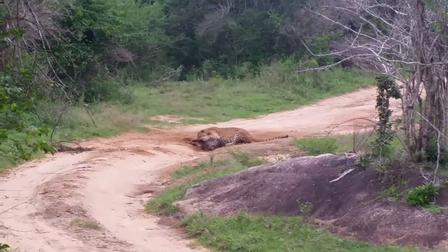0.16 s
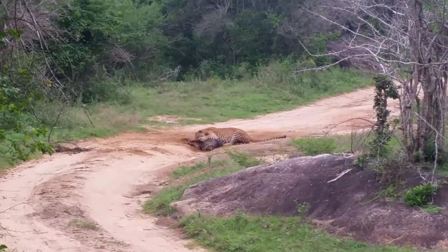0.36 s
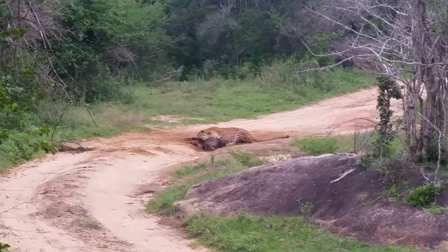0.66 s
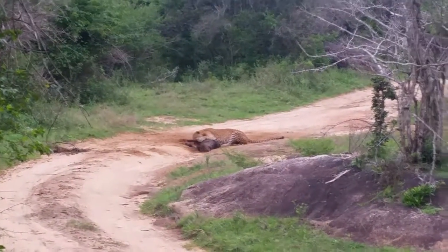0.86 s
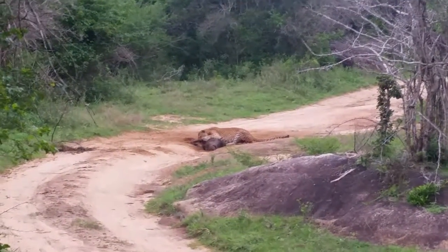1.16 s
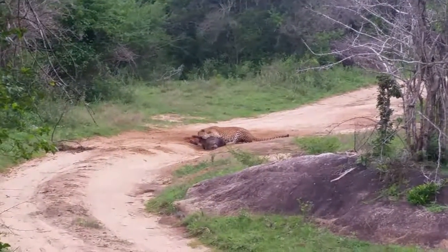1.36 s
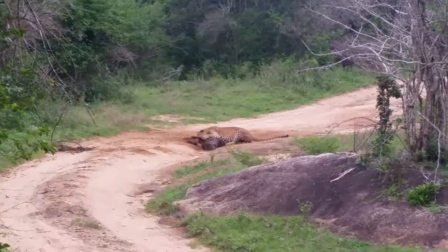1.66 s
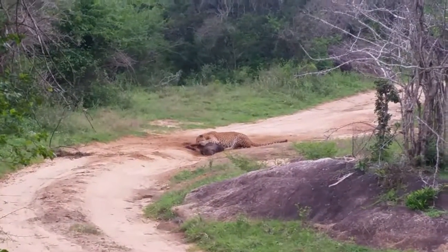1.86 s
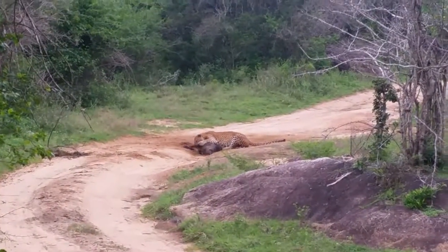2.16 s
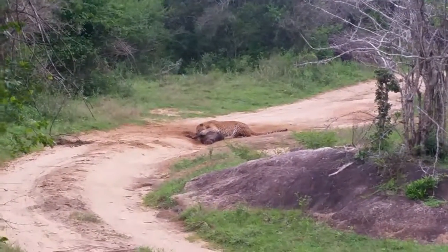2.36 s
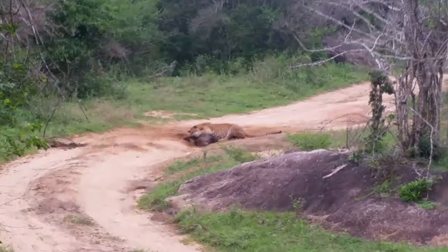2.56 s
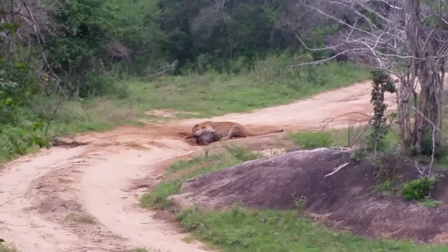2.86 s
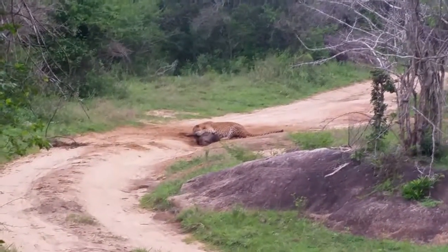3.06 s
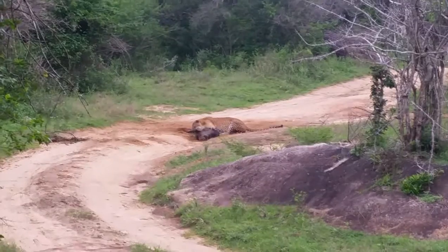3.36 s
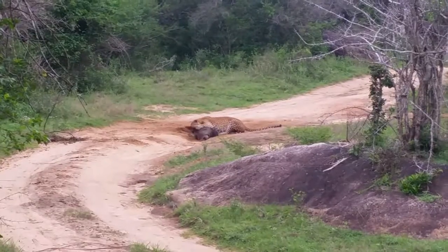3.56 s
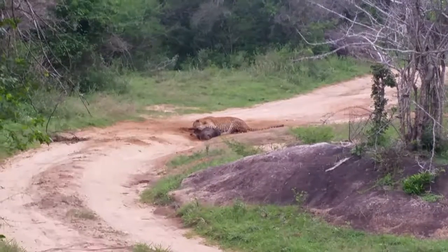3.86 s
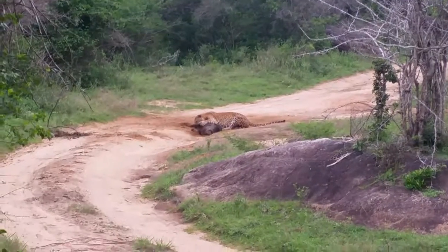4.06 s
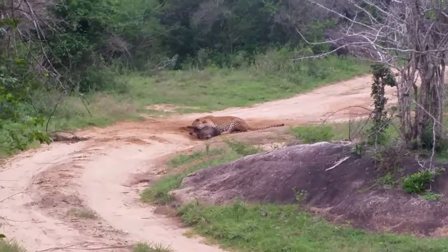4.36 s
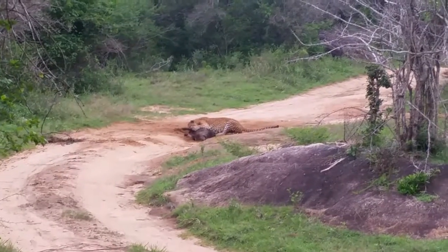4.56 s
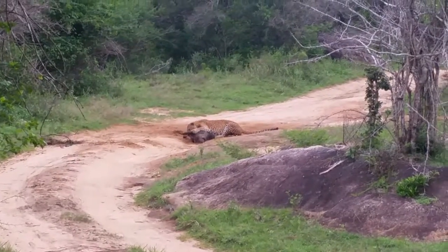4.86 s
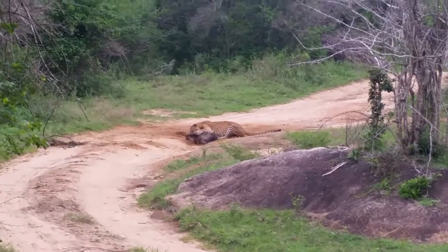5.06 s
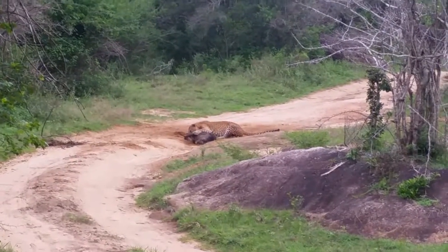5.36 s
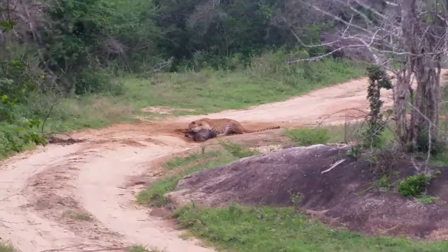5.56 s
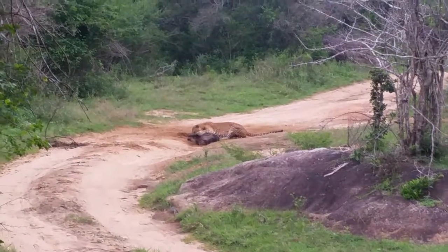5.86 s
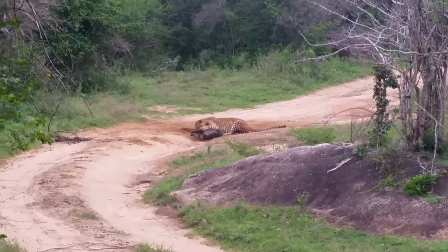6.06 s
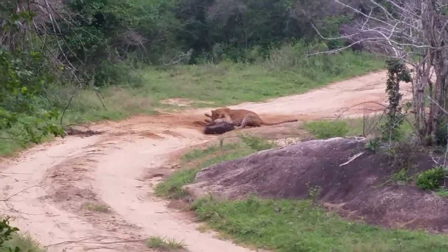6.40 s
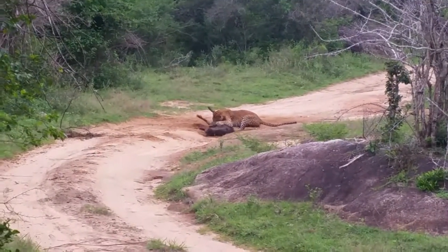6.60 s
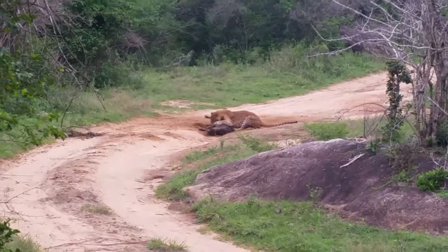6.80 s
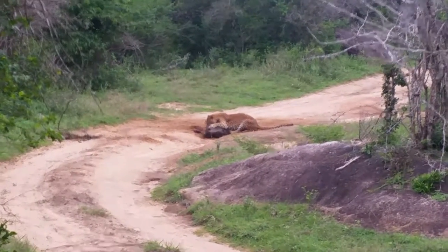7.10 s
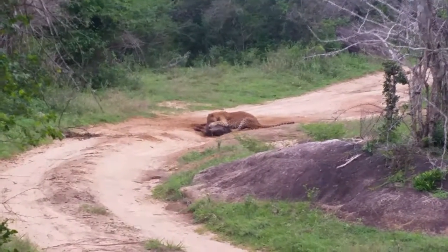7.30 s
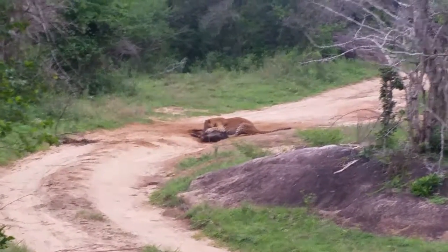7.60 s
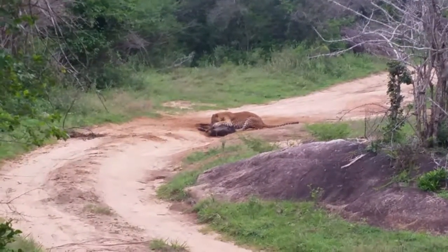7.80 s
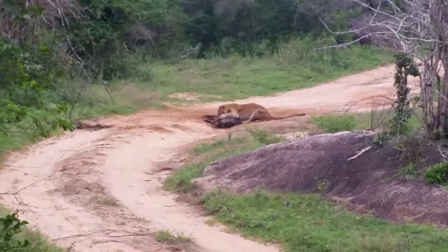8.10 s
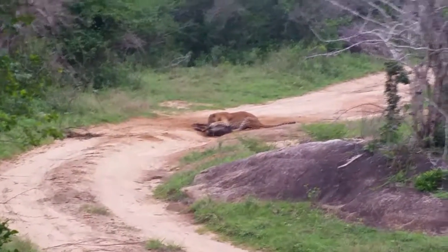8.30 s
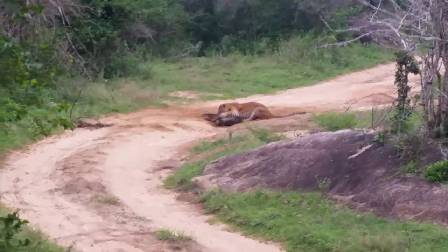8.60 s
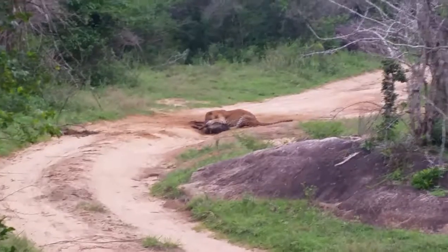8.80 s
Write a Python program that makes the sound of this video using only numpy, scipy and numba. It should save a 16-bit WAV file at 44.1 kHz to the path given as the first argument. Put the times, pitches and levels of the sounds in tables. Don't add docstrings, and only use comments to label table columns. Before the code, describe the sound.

Outdoors on a forest track, a high, steady cricket chorus hums over light breeze, leaf hiss and low wind thuds on a small stereo camera microphone. A faint bird whistle falls early on; a cricket trill swells midway. Small taps and a seat creak come from the parked vehicle. Then a boar held down by a big cat pants faintly, grunts, squeals roughly and gasps, while a close cricket chirps loudly until the end.

```python
import sys
import numpy as np
from scipy import signal
from scipy.fft import rfft, irfft, next_fast_len
from scipy.io import wavfile
from scipy.ndimage import uniform_filter1d
from numba import njit

SR = 44100
rng = np.random.default_rng(int(sys.argv[2]) if len(sys.argv) > 2 else 0)


def digitize_waveform(pressure):
    field = np.atleast_2d(pressure).T
    bounded = np.clip(field, -1, 1)
    quanta = np.round(bounded * 32767).astype(np.int16)
    wavfile.write(sys.argv[1], SR, quanta)


def ratio(d):
    e = np.asarray(d, float) / 20
    return 10 ** e


N = 394254
T = np.arange(N) / SR

# [t/s, level/dB]
SWELL = [(0.0, -1.74), (1.12, -2.5), (1.77, -1.16), (4.16, -0.75), (4.36, 0.5), (5.95, 0.8), (6.3, -0.5),
         (6.62, -0.7), (6.9, 3), (8.2, 4.5), (8.61, 1.8), (8.94, 2.5)]
# [rate/bursts per s, f/Hz, level/dB]
CHORUS = [(11.6, 7000, -59.5), (16, 6800, -73), (12, 7300, -63.5), (3.3, 6600, -68.5)]
# [f/Hz, density/dB per Hz]
HUM = [(1710, -72), (2900, -35), (3610, -15), (5050, -30.5), (5610, -30), (6000, -4), (6980, 1.5),
       (7850, -10), (8410, -51), (8600, -28), (11200, -76), (18900, -120)]
# [f/Hz, density/dB per Hz]
LEAVES = [(5760, -49.5), (9800, -0.5), (10800, -7.5), (12300, -1.5), (14900, -4), (15900, -2.5)]
# [f/Hz, density/dB per Hz]
WIND = [(8.8, -33.5), (15, -8.5), (22, -14), (76, -7), (188, -16), (224, -19), (399, -29), (793, -37.5),
        (1840, -47.5), (3000, -56.5), (3900, -56), (6600, -120)]
# [t/s, peak level/dB, f/Hz, left
# minus right/dB]
THUDS = [(0.264, -49, 81, 7), (0.925, -50, 81, -1.5), (1.182, -52.5, 86, 14), (1.316, -51.5, 143, -10),
         (2.193, -46, 80, -8), (2.326, -49.5, 78.1, -11), (2.755, -44.5, 53.8, 11),
         (2.926, -46.5, 106.7, -5), (3.048, -44.5, 72, -13), (3.889, -49, 170, -14), (4.087, -42, 127, -18),
         (4.206, -51.5, 87, -5.5), (5.18, -47.5, 137, 17), (6.173, -48, 156, -3), (8.026, -44, 200, 0.1),
         (8.288, -51, 130.4, -3), (8.37, -49, 110, 3), (8.4, -41, 147, -1), (8.44, -52, 120, -1),
         (8.645, -50, 170, -10), (8.78, -49, 72.5, -3)]
# [t/s, peak level/dB, decay/s, f/Hz]
TAPS = [(2.482, -57.5, 0.0071, 1410), (3.51, -68, 0.12, 810), (3.61, -69, 0.091, 945),
        (3.709, -67.5, 0.056, 1650), (4.609, -56, 0.063, 800), (5.27, -58, 0.02, 1430),
        (5.869, -58, 0.029, 1650)]
# [t/s, peak level/dB, fade/dB per s]
CREAKS = [(5.81, -61.5, 108), (5.86, -52.5, 94), (5.93, -64, 63), (5.98, -59, 262), (6.198, -66.5, 300)]
# [start t/s, end t/s, start level/dB, end level/dB]
FAINT_SPELLS = [(1.3, 2.358, -97, -66.5), (2.36, 4.05, -71.5, -71.5), (5.32, 6.0, -71, -91),
                (7.453, 7.837, -66, -62), (8.275, 8.68, -67.5, -72.5)]
# [start t/s, period/s, chirps]
TRILL = [
    (4.0245, .0368, 9),
    (4.3805, .0768, 12),
]
# [left delay/ms, right delay/ms, level/dB]
TRILL_ECHOES = [(.3, .1, 5.5), (5.4, 5.1, 5), (11.2, 10.4, -1.5), (16.5, 17.5, -7.5)]
# [t/s, peak level/dB, middle f/Hz, wing strokes]
NEAR_CHIRPS = [(2.7756, -58, 5040, 1), (2.83, -54.5, 5040, 1), (2.899, -49.5, 5170, 2),
               (7.1783, -44.5, 4790, 1), (7.235, -44.5, 4810, 1), (7.2957, -40.5, 5000, 2),
               (7.3877, -36, 5070, 2), (7.8363, -41, 4720, 1), (7.87, -37, 5130, 2), (7.95, -32.5, 5190, 2),
               (8.0318, -31.5, 5230, 2), (8.1204, -30.5, 5260, 2), (8.2135, -30.5, 5280, 2),
               (8.688, -43.5, 5150, 2), (8.7621, -36.5, 5220, 2), (8.8402, -33.5, 5260, 2),
               (8.924, -32, 5290, 1)]
# [left delay/ms, right delay/ms, level/dB]
NEAR_ECHOES = [(5.5, 5.2, -2), (9, 4.5, -10), (14, 4.3, -30)]
# [f/Hz, level/dB]
GRILLE = [(7900, -0.5), (8350, -5), (8600, -16), (9400, -14), (9900, -2), (10300, 3)]
# [t/s, effort level/dB, mouth opening 0-1]
CRIES = [
    [(5.42, -78, 0.1), (5.516, -49.5, 0.14), (5.644, -47.5, 0.12), (5.72, -70, 0.45)],
    [(6.55, -96, 0.4), (6.6, -51.5, 0.6), (6.63, -38, 0.65), (6.66, -34.5, 0.66), (6.73, -37, 0.67),
     (6.81, -56, 0.89)],
    [(6.81, -59.5, 0.83), (6.92, -42, 0.68), (6.98, -35.5, 0.53), (7.06, -35, 0.78), (7.25, -35, 0.76),
     (7.43, -30.5, 0.72), (8.04, -28.5, 0.69), (8.13, -30.5, 0.66), (8.225, -43.5, 0.72)],
    [(8.225, -48.5, 0.74), (8.29, -44, 0), (8.325, -58, .45), (8.36, -53.5, .08), (8.5, -60, 0.19),
     (8.6, -77, .45)],
]
# [jaw resonance level/dB, chest level/dB, snout level/dB, chest lead/s]
POSTURES = [
    (-9.5, -7.5, -17, 0.0078),
    (-2.1, -6, -20, 0.03),
    (-39, -5, -13, 0.032),
    (-14, 0, 6.5, 0.001),
]
# [t/s, fold f/Hz, first partial level/dB, second partial level/dB, flap f/Hz]
WHISTLE = [(7.06, 502.2, -42, -44, 90.2), (7.22, 479.4, -45, -40, 84.52),
           (7.47, 481.6, -42.5, -35.5, 94.16), (7.57, 504, -41, -37.5, 92.9),
           (7.66, 486, -42, -34.5, 87.84), (7.84, 476.4, -37.5, -39, 92.16),
           (8.03, 456.1, -30, -41.5, 92.7), (8.126, 468, -30, -62, 90.3), (8.2, 490, -38, -68.5, 97.8)]
# [t/s, f/Hz, level/dB]
GLIDE = [(6.86, 684.3, -47), (6.874, 689, -49.5), (6.884, 736, -50.5), (6.954, 734.9, -35.5),
         (7.024, 871, -37), (7.06, 870, -51.5)]
# [t/s, rasp share 0-1]
RASP = [(7.0, 1), (7.12, .45), (7.3, .26), (7.55, .16), (7.8, .2), (8.04, .24), (8.1, .7), (8.2, 1)]
# [f/Hz, level/dB]
NASAL_VALLEYS = [(590, 0.5), (680, -6.5), (770, -2.5), (2400, 1), (2570, -11), (2750, -13), (3150, -11),
                 (3450, -14.5), (3800, 3.5)]
# [f/Hz, left minus right/dB]
SHADE = [(600, 1.5), (780, 6.5), (950, 10), (1120, 17), (1290, -6), (1550, 5), (1800, 8.5), (2050, -1),
         (2800, 12.5), (4400, 2)]


def unit(x):
    return x / rms(x)


def rms(x):
    return np.sqrt(np.mean(x ** 2, axis=-1, keepdims=True))


def even(x, hold_s=0.05):
    return x / np.sqrt(np.abs(uniform_filter1d(x ** 2, int(hold_s * SR))) + 1e-9)


def columns(rows, silent=None):
    s, *rest = np.transpose(rows)
    return [np.interp(T, s, c, silent, silent) for c in rest]


def sweep_phase(hz):
    return 2 * np.pi * np.cumsum(hz) / SR


def colour(x, points, power=0.89):
    hz, db = np.transpose(points)
    size = next_fast_len(N + 4096, True)
    f = np.maximum(np.linspace(0, SR / 2, size // 2 + 1), 1)
    gain = ratio(power * np.interp(np.log(f), np.log(hz), db))
    return irfft(rfft(x, size) * gain, size)[..., :N]


def walk(rate):
    k = int(SR / rate)
    held = np.repeat(rng.standard_normal(N // k + 1), k)
    return uniform_filter1d(uniform_filter1d(held, k), k)[:N]


@njit
def svf(x, g, k):
    y, b, l = np.empty(len(x)), 0., 0.
    for i in range(len(x)):
        v = (b + g[i] * (x[i] - l)) / (1 + g[i] * (g[i] + k[i]))
        b, l, y[i] = 2 * v - b, l + 2 * g[i] * v, k[i] * v
    return y


def ring(x, hz, width, start=int(5.3 * SR)):
    g = (np.tan(np.pi * hz / SR) + 0 * T)[start:]
    k = (width / hz + 0 * T)[start:]
    return np.pad(svf(svf(x[start:], g, k), g, k), (start, 0))


def forest(x, t60_s, wet_db):
    t = T[:SR]
    tail = rng.standard_normal((2, SR)) * ratio(-60 * t / t60_s) * np.minimum(t / 0.0009, 1)
    tail /= np.sqrt(np.sum(tail ** 2, axis=1, keepdims=True))
    size = next_fast_len(N + SR, True)
    return ratio(wet_db) * irfft(rfft(x, size) * rfft(tail, size), size)[:, :N]


def echoes(x, rows):
    out = np.zeros((2, N))
    for *delays_ms, db in rows:
        for port, source, ms in zip(out, x, delays_ms):
            lag = int(abs(ms) * SR / 1000)
            port[lag:] += ratio(db) * source[:N - lag]
    return out


def add(out, s, grain, pan_db=0.):
    i = max(int(s * SR), 0)
    out[:, i:i + grain.shape[-1]] += grain[..., :N - i] * ratio(np.array([[pan_db], [-pan_db]]) / 2)


def chirp(hz, second_db=-20, third_db=-30, sweep=0.4, length_s=0.01095, skew=1.71, fade=0.15):
    u = np.arange(int(length_s * SR)) / (length_s * SR)
    phase = sweep_phase(hz * (1 + sweep * (0.62 - u)))
    octave = ratio(second_db) * np.sin(2 * phase) * np.exp(-fade * (u - 0.4)) * np.array([[1], [-1]])
    third = ratio(third_db) * np.sin(3 * phase)
    return np.sin(np.pi * u ** skew) ** 2 * (np.sin(phase) + octave + third)


def singer(rate, hz, count, sweep=0.291, length_s=0.01303):
    out = np.zeros((2, N))
    chance = rng.standard_normal((120, 3))
    times = np.cumsum((1 + 0.012 * chance[:, 0]) / rate)
    for s, (_, size, detune) in zip(times, chance):
        stroke = chirp(hz * (1 + 0.01 * detune), -38.0, -70.5, sweep, length_s) * ratio(2 * size)
        for start in s - 0.08 + 0.02 * np.arange(count):
            if 0 < start < N / SR:
                add(out, start, stroke)
    return out


def far_bird():
    length_s = 0.5
    t = np.clip(T - 2.51, 0, length_s)
    hz = 1650 + 1050 * np.exp(-t / 0.34)
    swell = np.sqrt(np.abs(np.sin(np.pi * t / length_s)))
    level = ratio(-83.5 - 8 * t / length_s + 4.9 * walk(24.9)) * swell
    bird = level * np.sin(sweep_phase(hz * (1 + 0.0114 * walk(66))))
    return bird + forest(bird, 0.8, 0)


def chorus(swell_db):
    hum = np.array([colour(rng.standard_normal(N), HUM) for _ in range(2)])
    out = ratio(-56.0) * unit(hum)
    for rate, hz, db in CHORUS:
        strokes = singer(rate, hz, count=3)
        direct = ratio(11.5) * echoes(strokes, [(*rng.uniform(0, 2, 2), 0)])
        out += ratio(db) * unit(direct + forest(strokes[0], 0.16, 0))
    return out * ratio(swell_db - np.mean(swell_db))


def leaves(background_db):
    gust_db = 6 * np.exp(-((T - 2.03) / 0.63) ** 2)
    db = -88.5 + 1.7 * background_db + gust_db
    return np.array([ratio(db + 8.5 + 0.86 * walk(18)) * unit(colour(rng.standard_normal(N), LEAVES))
                     for _ in range(2)])


def wind(background_db):
    out = np.zeros((2, N))
    for port in out:
        steady = unit(colour(rng.standard_normal(N), WIND))
        rumble = signal.lfilter(*signal.butter(2, 250, fs=SR), steady)
        buffeted = steady + rumble * (ratio(4.8 * walk(25)) - 1)
        port += ratio(-63.5 + 1.62 * background_db + 4.5) * buffeted
    return out


def gust_thuds():
    out = np.zeros((2, N))
    for s, db, hz, pan_db in THUDS:
        cycles = T[:int(1.5 * SR / hz)] * hz
        thud = np.sin(2 * np.pi * cycles) * np.sin(np.pi * cycles / 1.5) ** 2
        add(out, s, ratio(db) * thud, pan_db)
    return out


def air(background_db):
    out = leaves(background_db) + wind(background_db)
    out[1] *= ratio(2.0)
    return out + gust_thuds()


def body_taps():
    out = np.zeros((2, N))
    t = T[:int(0.3 * SR)]
    for s, db, length_s, hz in TAPS:
        band = signal.butter(1, [0.5 * hz, 0.74 * hz], "band", fs=SR)
        burst = signal.lfilter(*band, rng.standard_normal(len(t)))
        add(out, s, ratio(db + 10.5) * burst * np.exp(-t / length_s), -2)
    return out


def seat_creak():
    seat = np.zeros(N)
    for s, db, fade in CREAKS:
        attack = np.clip(1 + (T - s) / 0.032, 0, 1)
        seat += ratio(db - fade * np.maximum(T - s, 0)) * attack
    slips = rng.standard_normal(N) * ratio(2.6 * walk(50))
    creak = seat * (unit(ring(slips, 270, 112)) + ratio(-10.5) * unit(ring(slips, 515, 220)))
    return np.array([np.roll(creak, 8), creak])


def faint_crickets():
    pair = singer(12.8, 5120, count=2) + ratio(0.5) * singer(12.0, 5600, count=2, sweep=0.34)
    spells = sum(ratio(np.interp(T, row[:2], row[2:], -120, -120) + 4.0) for row in FAINT_SPELLS)
    return spells * unit(pair + forest(pair[0], 0.51, 1.6))


def trilling_cricket():
    out = np.zeros((2, N))
    for doubled, (start, period, count) in enumerate(TRILL):
        for s in start + period * np.arange(count):
            warm_s = s - TRILL[0][0]
            detune, first, second = rng.standard_normal(size=3)
            hz = 5250 + 60 * detune - 480 * np.exp(-warm_s / 0.32)
            stroke = chirp(hz, -22, -34, sweep=0.38, fade=5.5)
            db = -38.5 - 24 * np.exp(-warm_s / 0.096)
            add(out, s - 0.0075, ratio(db + 1.4 * first) * stroke)
            add(out, s + 0.015, doubled * ratio(db + 2.0 + 1.0 * second) * stroke)
    return ratio(-9.5) * echoes(out, TRILL_ECHOES) + forest(out[0], 0.2, -0.5)


def near_cricket():
    out = np.zeros((2, N))
    for s, db, hz, strokes in NEAR_CHIRPS:
        lack_db = -30 - db
        pan_db = -2.5 + 0.63 * lack_db
        start = s - 0.0045
        add(out, start, ratio(db) * chirp(hz, -10, -25.5), pan_db)
        if strokes > 1.5:
            second = ratio(db + 0.29 * lack_db) * chirp(hz + 40, -17, -25.5)
            add(out, start + 0.0205, second, pan_db - 4)
    return out + echoes(out, NEAR_ECHOES) + forest(out[0], 0.21, -1)


def posture():
    cry = np.searchsorted([call[0][0] for call in CRIES[1:]], T)
    jaw_db, chest_db, snout_db, lead_s = uniform_filter1d(np.transpose(POSTURES)[:, cry], 2500)
    return ratio(jaw_db), chest_db, snout_db, lead_s


def fold_whistle(fold):
    def smooth(db):
        return np.sqrt(2) * uniform_filter1d(ratio(db), 600)

    _, first_db, second_db, _ = columns(WHISTLE, silent=-120)
    whistle = smooth(first_db) * np.sin(fold) + smooth(second_db) * np.sin(2 * fold)
    rise = sweep_phase(columns(GLIDE)[0] * (1 + 0.0322 * walk(150)))
    glide_db = columns(GLIDE, silent=-120)[1]
    return whistle + smooth(glide_db + 3 * walk(60)) * np.sin(rise)


def flap_pulses(fold):
    flap_hz = columns(WHISTLE)[3]
    flap = sweep_phase(flap_hz * (1 + 0.018 * walk(40)))
    pulses = np.sin(9.5 * fold) / (2 * np.sin(fold / 2) + 1e-9) - 0.5
    return pulses * (np.exp(2.18 * np.cos(flap)) - 1.5)


def chest(x, jaw, tight):
    hz = 452 + 98 * (1 - tight) * np.clip(1 - jaw, 0, 1)
    main = ring(x, hz, 170 + 110 * (1 - tight))
    return main + jaw * (ring(x, 518, 98) + ratio(-7.5) * ring(x, 200, 180))


def throat(x, jaw, tight, held_s):
    hz = 741 + 125 * tight + 99 * held_s
    width = np.clip(300 - 110 * (1 - tight) - 70 * jaw ** 2, 80, 400)
    return ring(x, hz, width) - jaw * ring(x, 1200, 95)


def mouth(x, tight):
    return ring(x, 1650 - 77.5 * tight, 217) + ratio(-6.0) * ring(x, 1934, 130)


def snout(x, jaw, held_s):
    nostrils = ratio(2) * np.clip(1 - jaw, 0.05, 1)
    upper = nostrils * ratio(-72 * (held_s - 0.24) ** 2)
    lower = nostrils * ratio(-9 - 72 * (held_s - 0.59) ** 2)
    rise_hz = 190 * held_s
    return (ring(x, 2170, 150) + nostrils * ring(x, 2650 + rise_hz, 560)
            + upper * ring(x, 4280 + rise_hz, 200) + lower * ring(x, 3950, 180))


def boar():
    fold_hz = columns(WHISTLE)[0]
    fold = sweep_phase(fold_hz * (1 + 0.00406 * walk(60) + 0.006 * walk(15)))
    chopped = flap_pulses(fold)
    rasp = rng.standard_normal(N) * ratio(3 * walk(70))
    share = np.clip(columns(RASP)[0], 0, 1)

    jaw, chest_db, snout_db, lead_s = posture()
    squealing = columns(WHISTLE, silent=-120)[1] > -99
    tight = uniform_filter1d(1. * squealing, 3500)
    held_s = tight * (T - WHISTLE[0][0])

    def part(tract, hoarse_db=0):
        voiced = np.sqrt(1 - share) * even(tract(chopped)) * ratio(-hoarse_db)
        return voiced + np.sqrt(share) * even(tract(rasp), 0.22) * ratio(hoarse_db)

    chest_part = part(lambda x: chest(x, jaw, tight))
    throat_part = part(lambda x: throat(x, jaw, tight, held_s)) * ratio(-4 * (2.5 - share))
    mouth_part = part(lambda x: mouth(x, tight))
    snout_part = part(lambda x: snout(x, jaw, held_s), 3)

    effort = np.max([ratio(columns(call, silent=-120)[0]) for call in CRIES], axis=0)
    shut = 1 - np.clip(columns(np.vstack(CRIES))[1], 0, 1)
    chest_level = np.interp(T + lead_s, T, effort) * ratio(chest_db - 9.5 * tight)
    mouth_level = effort * ratio(5 - 41.5 * shut)
    snout_level = effort * ratio(snout_db - 29 * shut + 7.5 * held_s)

    voice = fold_whistle(fold)
    for level, sound in ((chest_level, chest_part), (effort, throat_part),
                         (mouth_level, mouth_part), (snout_level, snout_part)):
        voice += uniform_filter1d(level, 300) * sound
    nasal = np.clip(tight + 0.6 * jaw ** 2 + 0.49, 0, 1)
    voice = nasal * colour(voice, NASAL_VALLEYS) + (1 - nasal) * voice
    left, right = colour(voice, SHADE, 0.51), colour(voice, SHADE, -0.56)
    return np.array([left, np.roll(right, 2)]) * ratio(1) + forest(voice, 0.6, -11)


def scene():
    background_db, = columns(SWELL)
    background = chorus(background_db) + far_bird() + air(background_db)
    vehicle = body_taps() + seat_creak()
    crickets = faint_crickets() + trilling_cricket() + near_cricket()
    return colour(background + vehicle + crickets, GRILLE) + boar()


def band_limit(x):
    return signal.sosfilt(signal.butter(12, 15840, fs=SR, output="sos"), x)


def record(dry):
    mix = dry - 0.0004
    return band_limit(mix)


dry = scene()
out = record(dry)
digitize_waveform(out)
```